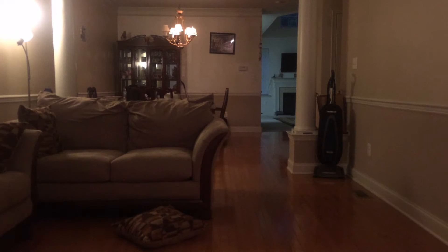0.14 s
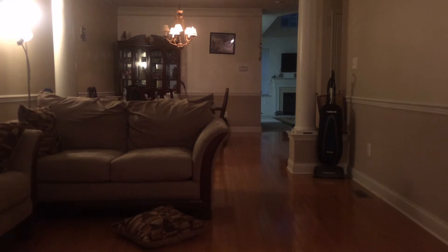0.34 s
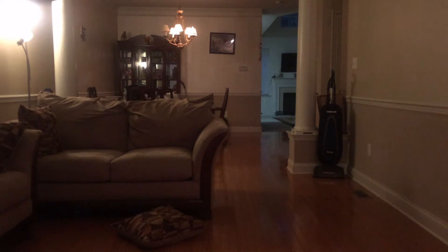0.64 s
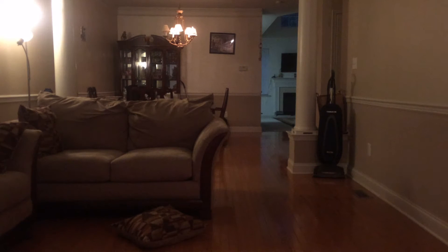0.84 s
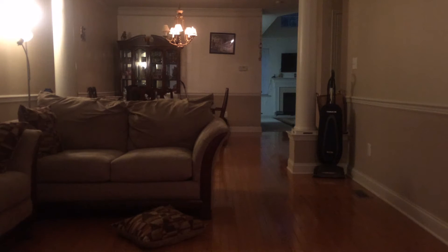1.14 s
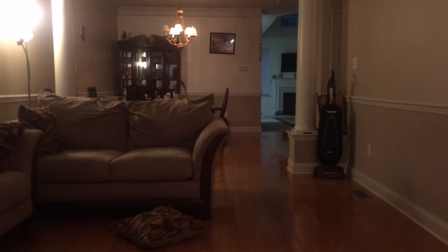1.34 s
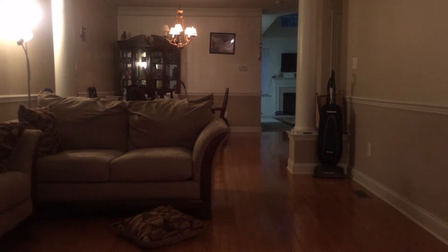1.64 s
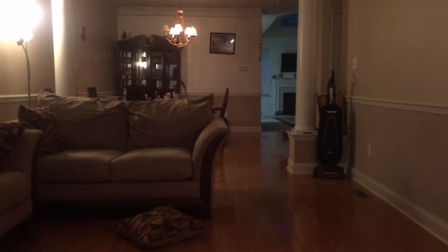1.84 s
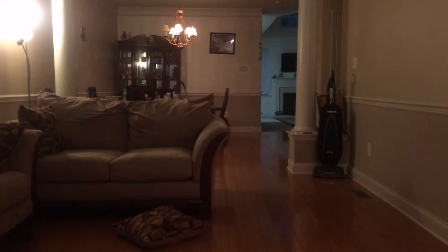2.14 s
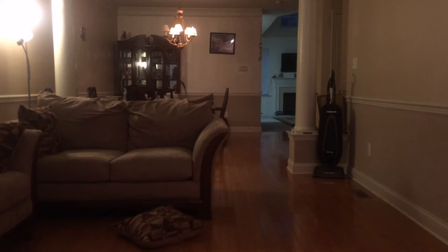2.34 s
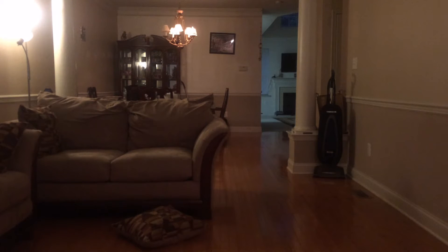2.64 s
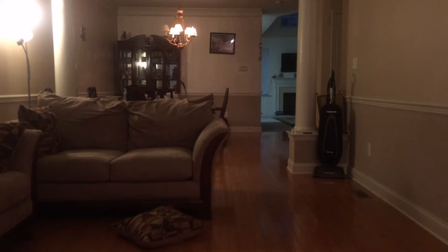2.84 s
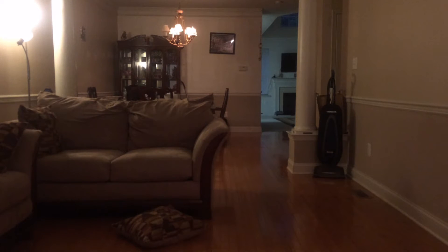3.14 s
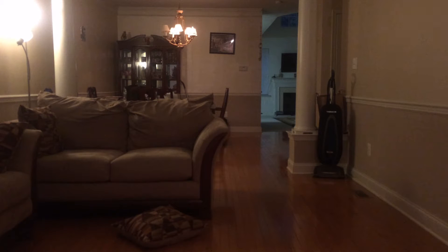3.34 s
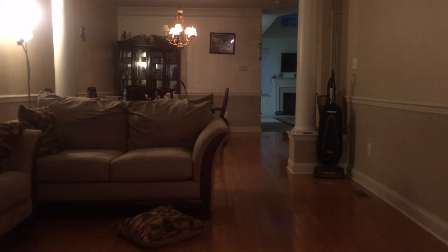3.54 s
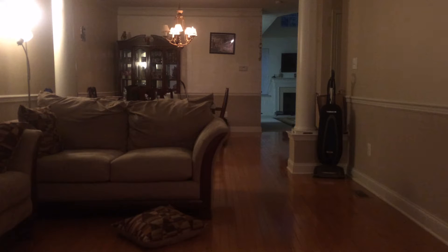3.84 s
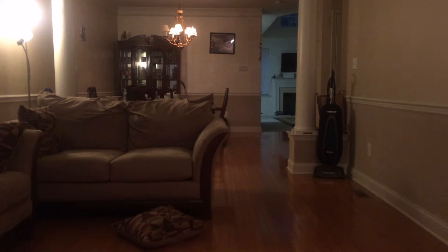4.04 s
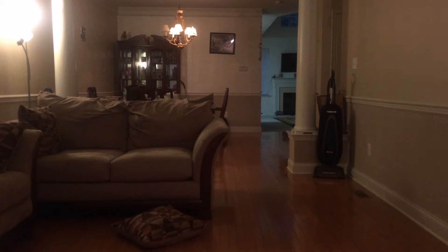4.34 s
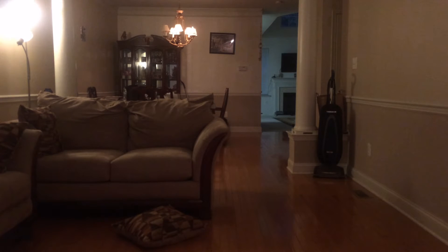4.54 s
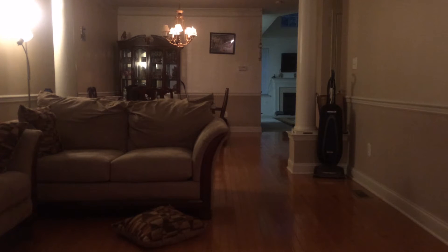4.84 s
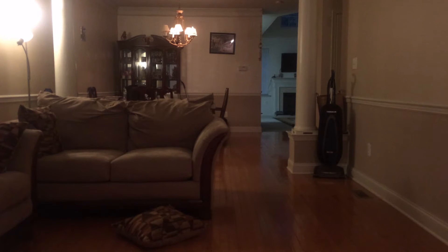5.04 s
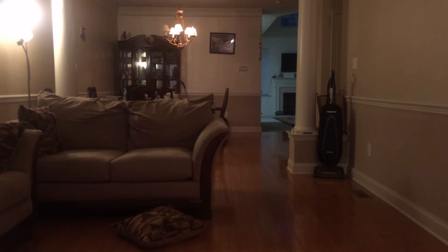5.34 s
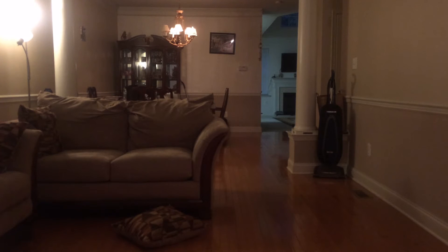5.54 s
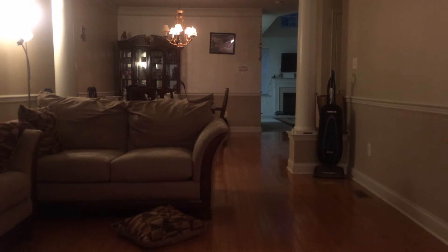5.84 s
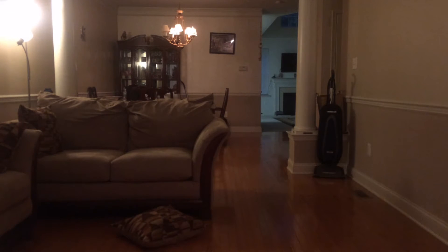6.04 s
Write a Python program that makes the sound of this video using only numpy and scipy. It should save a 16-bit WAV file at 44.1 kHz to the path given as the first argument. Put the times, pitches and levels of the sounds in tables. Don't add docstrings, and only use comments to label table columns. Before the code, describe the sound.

In a quiet living room with a wooden floor, a hollow plastic spring dart blaster is worked very near a phone microphone. It fires immediately at 0 s: a catch click and, milliseconds later, a plunger smack with a low airy thump. At 0.93-1.01 s the slide rattles back over its catches in a burst of cracks, then slams forward at 1.27 s, with a sharp tap at 1.34. Shot two snaps at 1.67. Pull at 2.11-2.18, slam at 2.46, shot at 2.81. Pull at 3.47-3.56, hard slam at 3.85, a small tap at 3.91, shot at 4.21. Pull at 4.74-4.81, slam at 5.16, final shot at 5.61. Faint handling ticks come between, and a last pull begins at 6.14, clacking at 6.17. Each knock rings briefly in the shell and splashes into a bright half-second room tail, over soft low rumble and faint hiss.

```python
import sys
import numpy as np
from scipy import signal
from scipy.fft import rfft, irfft
from scipy.io import wavfile
from scipy.ndimage import uniform_filter1d

SR = 44100
rng = np.random.default_rng(int(sys.argv[2]) if len(sys.argv) > 2 else 0)


def ratio(d):
    e = np.asarray(d, float) / 20
    return 10 ** e


def output_pcm(signal):
    pcm = np.clip(np.atleast_2d(signal).T, -1, 1) * 32767
    wavfile.write(sys.argv[1], SR, np.round(pcm).astype(np.int16))


N = 272979

# pitch_hz, density_db_per_hz
HUSH_SPECTRUM = [(18, -43), (30, -13), (157, 0), (215, -8), (740, -17.5), (1720, -16.5), (2750, -25.5),
                 (13000, -44.5), (14800, -46), (16000, -41)]
# delay_ms, level_db
ECHOES = [(3.1, -7.5), (9.8, -6), (13.5, -8.5), (18.6, -9.5), (27, -15), (41, -16)]
# pitch_hz, t60_s
ROOM_DECAY = [(60, 0.15), (160, 0.3), (420, 0.56), (1100, 0.63), (2900, 0.59), (7700, 0.55), (14000, 0.29)]
# pitch_hz, level_db
ROOM_COLOUR = [(60, 3.5), (250, -6), (1000, -2), (4000, 2), (9000, 1), (15000, 3)]
# pitch_hz, level_db, t60_s
STANDING_MODES = [(97, 4.5, 0.24), (164, -2, 0.23), (236.5, -4, 0.4), (315.7, -3.5, 0.59), (552.8, 1, 0.41),
                  (650, -9.5, 0.4), (702, -6.5, 0.34), (896, -1.5, 0.33), (1157, -2, 0.58),
                  (1260, -14.5, 0.24), (1605, 2.5, 0.25), (1970, -7.5, 0.58)]
# pitch_hz, level_db, t60_s
SHELL_MODES = [(605, -40, 0.019), (695, -1.5, 0.022), (937, 3, 0.012), (1234, 2, 0.014),
               (1350, 3.5, 0.0041), (1590, 6, 0.013), (2020, 2, 0.011), (2250, -1, 0.0037),
               (2930, 10.5, 0.0023)]
# pitch_hz, level_db, t60_s
TUBE_MODES = [(102, -9, 0.081), (163, 31, 0.07), (253, -17, 0.032), (293, 0, 0.041), (544, -15, 0.024)]
# pitch_hz, level_db
CRACK_SPECTRUM = [(300, -36), (1200, 4), (2500, 0.5), (3600, -2), (5000, 0), (7000, -2.5), (10000, -5.5),
                  (13000, -8), (16000, -18)]
# start_s, end_s
STROKES = [(.838, .928), (.932, 1.022), (1.222, 1.27), (2.1, 2.195), (2.386, 2.46), (3.467, 3.58),
           (3.782, 3.843), (4.723, 4.83), (5.073, 5.155), (6.137, 6.19)]
STROKE_LEVELS = [-63.5, -33.5, -36.5, -30.5, -33.5, -28, -31, -30.5, -27.5, -29.5]
# start_s, crack_peak_db, shell_minus_crack_db
TICKS = [(0, -36, 21), (0.8438, -47, 9), (0.908, -45, 11.5), (1.017, -24, -12), (1.648, -26, 0.5),
         (2.087, -40, 12), (2.1024, -32, 10), (2.1874, -30, -2), (2.765, -23, -7), (2.7722, -22.5, 1),
         (3.125, -41, 13.5), (3.181, -38, 12), (3.4635, -26.5, -10), (4.163, -29, -13), (4.17, -28.5, 4.5),
         (4.197, -28.5, 5), (4.7203, -29, -4), (5.58, -27.5, -13), (5.588, -37, 8), (5.998, -38, 6),
         (.9303, -33, 12), (2.378, -32, 14), (3.777, -40, 19), (3.838, -27, 17), (5.066, -32, 13),
         (6.1343, -31, 9), (3.914, -18, -3), (1.337, -6.5, -7.5)]
# start_s, crack_peak_db, shell_minus_crack_db, panel_hz
PULLS = [(.934, -19, 1, 1520), (.9408, -13, -5, 1440), (0.9531, -10, 0.5, 1590), (0.9597, -4, -3, 1560),
         (.9684, -2, -5.5, 905), (0.9851, 0, -6, 1590), (1.0004, -2, -9, 1640), (1.008, -5.5, 0.5, 613),
         (2.1106, -20, 5, 1420), (2.1186, -12, -6.5, 614), (2.1301, -4, -5, 1490), (2.1467, -1.5, -6, 1170),
         (2.1592, 0.5, -8.5, 2770), (2.1754, -2, -2, 875), (3.4723, -15.5, -1, 2060), (3.488, -5, -6, 1640),
         (3.5046, -7, -3, 1180), (3.5289, -0.5, -9, 2550), (3.5474, -2.5, -3, 1670), (3.56, -7, -5, 1870),
         (4.7349, -21, 4, 1520), (4.747, -14, -4, 1560), (4.7562, 0.5, -6.5, 1580), (4.7862, -4, -10, 1230),
         (4.8044, -3, -1.5, 2230), (4.813, -10, 2, 1545), (6.14, -32, 6, 675), (6.148, -18, 4, 1280),
         (6.1678, -.5, -14, 1580), (6.18, -16, 8.5, 1600)]
# start_s, crack_peak_db, shell_minus_crack_db, panel_hz
PUSHES = [(1.2164, -15, -19, 1240), (1.2206, -11, -3.5, 670), (1.2494, -18, 0, 1500),
          (1.2704, -1.5, -6.5, 1553), (1.279, 3.5, -3.5, 1358), (2.3835, -9.5, -4.5, 1450),
          (2.4384, -10, 2, 685), (2.4463, -19.5, 13.5, 800), (2.4613, -1.5, -2.5, 1810),
          (2.4704, -7, -12, 1840), (3.7808, -9.5, -7, 2100), (3.7934, -18, 0, 590),
          (3.8442, -2.5, -23, 1350), (3.8521, 4, -5, 2300), (3.8634, -1.5, -4, 2440),
          (5.0719, -12, 0, 1020), (5.1364, -19, 2, 1170), (5.1457, -11, 6, 1110),
          (5.1572, -1.5, -8.5, 1100), (5.163, -8, 1, 1183), (5.169, -6.5, 2, 1580), (5.177, -25, -2, 1610)]
# start_s, crack_peak_db, shell_minus_crack_db
CATCHES = [(.0055, -6, 3.5), (1.6716, -0.5, -9), (2.812, -2.5, -6), (4.2145, -4, -2.5), (5.6058, -4.5, -4)]
# rattle_ms, snap_minus_crack_db
KNOCK_KINDS = [
    (3.05, -1.5),
    (3.04, 1),
    (2.6, -3.5),
    (4.3, -10),
]
SLAM_TIMES = [.0133, 1.6772, 2.82, 4.222, 5.6132]
# blow_db, shell_shudder_db, air_thump_db, crack_db
SLAM_LEVELS = [(-11.5, -6, -32, -11.5), (-17, -3, -20.5, -12.5), (-6, -7, -17, -12.5), (-15, -5, -29, -13),
               (-7, -5, -22, -13)]
# delay_ms, level_db
REBOUNDS = [
    (0, 4),
    (2.8, -2),
    (9.3, -7.5),
    (14, -17),
    (24, -44),
]
# first_hz, first_db, second_hz, second_db
GRIPS = [(620, -9.5, 1000, -6.5), (775, -12.5, 1350, -13.5), (600, -10, 1770, -24), (1560, -14, 380, -6.5),
         (800, -16, 300, -9)]


def unit(x):
    return x / np.sqrt(np.sum(x ** 2))


def along(table, hz):
    point_hz, value = np.transpose(table)
    return np.interp(np.log(np.maximum(hz, 1)), np.log(point_hz), value)


def colour(x, table, size=512):
    cepstrum = irfft(np.log(ratio(along(table, np.fft.rfftfreq(size, 1 / SR)))))
    cepstrum[1:size // 2] *= 2
    cepstrum[size // 2 + 1:] = 0
    response = irfft(np.exp(rfft(cepstrum)))
    return signal.oaconvolve(x, unit(response))[:len(x)]


def thin(x, hz):
    return signal.sosfilt(signal.butter(3, hz, "high", fs=SR, output="sos"), x)


def ring(x, modes):
    t = np.arange(SR // 2) / SR
    response = 0
    for hz, db, t60_s in modes:
        response = response + ratio(db) * np.sin(2 * np.pi * hz * t) * ratio(-60 * t / max(t60_s, 1e-3))
    return signal.oaconvolve(x, unit(response))[:len(x)]


def strike(start_s, gains, rattle_ms, spiky=.8, size=1024, count=6):
    t = np.arange(size) / SR
    fade = np.exp(-1000 * t / np.clip(rattle_ms, .3, 5)[:, None])
    fade = fade * (1 - np.exp(-t / 0.00045))
    contacts = rng.standard_normal((len(start_s), size))
    fade = fade * abs(contacts) ** spiky
    for _ in range(count):
        tones = rfft(np.sign(contacts) * fade)
        contacts = irfft(tones / abs(tones))
    contacts = contacts * np.sqrt(np.sum(fade ** 2, 1, keepdims=True))
    out = np.zeros(N + size)
    first = np.maximum(start_s * SR, 0).astype(int)
    np.add.at(out, first[:, None] + np.arange(size), gains[:, None] * contacts)
    return out[:N]


def hush():
    hz = np.fft.rfftfreq(N, 1 / SR)
    noise = irfft(rfft(rng.standard_normal(N)) * ratio(along(HUSH_SPECTRUM, hz)), N)
    return unit(noise) * np.sqrt(N) * ratio(-57.5)


def stored(power, t60_s, step_s):
    keep = ratio(-120 * step_s / np.maximum(t60_s, .004)) + np.zeros(len(power))
    return np.array([signal.lfilter([1 - k], [1, -k], row) for k, row in zip(keep, power)])


def room(x, size=384, count=96):
    room_db, build_s = 0.96, 0.0027
    far_db, far_t60_s = -13.5, 1.55
    standing_db = -15.0
    step_s = count / SR

    early = np.zeros(SR // 10)
    early[0] = 1
    for delay_ms, db in ECHOES:
        early[int(delay_ms * SR / 1000)] += ratio(db)

    grid = dict(fs=SR, nperseg=size, noverlap=size - count)
    hz, _, tones = signal.stft(x, **grid)
    power = uniform_filter1d(abs(tones) ** 2, size=3, axis=0)
    power = stored(power, 7 * build_s, step_s)
    near_gain = ratio(2 * (room_db + along(ROOM_COLOUR, hz)))
    near = near_gain[:, None] * stored(power, along(ROOM_DECAY, hz), step_s)
    dull = 1 / (1 + (hz / 6000) ** 2) / (1 + (400 / np.maximum(hz, 1)) ** 4)
    far = ratio(2 * far_db) * dull[:, None] * stored(power, far_t60_s, step_s)

    noise = signal.stft(rng.standard_normal(N), **grid)[2]
    noise = noise / np.sqrt(np.mean(abs(noise) ** 2))
    field = signal.istft(noise * np.sqrt(near + far), **grid)[1]
    field = np.r_[np.zeros(size // 2 + count), field][:N]
    return signal.oaconvolve(x, early)[:N] + ratio(standing_db) * ring(x, STANDING_MODES) + field


def strokes():
    t = np.arange(N) / SR
    load = np.zeros(N)
    for (start_s, end_s), db in zip(STROKES, STROKE_LEVELS):
        load += ratio(db) * np.interp(t, [start_s, end_s, end_s + .004], [.2, 1, 0], left=0)
    grain_db = 2.05 * rng.exponential(size=(2, N)) - 5.5
    grains = load * rng.standard_normal((2, N)) * ratio(grain_db)
    return thin(colour(grains[0], CRACK_SPECTRUM) + ratio(0.5) * ring(grains[1], SHELL_MODES), 330)


def clacks():
    knocks = [row[:3] for row in PULLS + PUSHES] + CATCHES + TICKS
    start_s, crack_db, shell_db = np.transpose(knocks)
    counts = [len(kind) for kind in (PULLS, PUSHES, CATCHES, TICKS)]
    rattle_ms, snap_db = np.repeat(KNOCK_KINDS, counts, axis=0).T
    crack = colour(strike(start_s, ratio(crack_db - 9.5), rattle_ms), CRACK_SPECTRUM)
    snap = strike(start_s, ratio(crack_db + snap_db - 7.5), rattle_ms / 3)
    snap = thin(colour(snap, CRACK_SPECTRUM), 4300)
    shell = ring(strike(start_s, ratio(crack_db + shell_db - 9), rattle_ms), SHELL_MODES)
    return thin(crack + snap + shell, 441)


def panels(t60_s=0.035, size=2048):
    start_s, crack_db, shell_db, hz = np.transpose(PULLS + PUSHES)
    t = np.arange(size) / SR
    gains = ratio(crack_db + shell_db - 12.5)
    rings = gains[:, None] * np.sin(2 * np.pi * hz[:, None] * t) * ratio(-60 * t / t60_s)
    rings = rings * (1 - np.exp(-t / 0.00062))
    out = np.zeros(N + size)
    np.add.at(out, (start_s * SR).astype(int)[:, None] + np.arange(size), rings)
    return out[:N]


def slams():
    recoil_db = -2
    blow_db, shudder_db, thump_db, crack_db = np.transpose(SLAM_LEVELS)[:, :, None]
    delay_ms, fall_db = np.transpose(REBOUNDS)
    slam_s = np.array(SLAM_TIMES)
    hit_s = (slam_s[:, None] + delay_ms / 1000).ravel()

    blows, shove = np.zeros((2, N))
    np.add.at(blows, (hit_s * SR).astype(int), ratio(blow_db + fall_db).ravel())
    shove[(slam_s * SR).astype(int)] = -ratio(thump_db.ravel())
    catch_s = np.transpose(CATCHES)[0]
    shove[(catch_s * SR).astype(int)] = -ratio(thump_db.ravel() + recoil_db)

    push = -signal.oaconvolve(blows, unit(np.hanning(22)))[:N]
    shudder = strike(hit_s - .001, ratio(shudder_db + fall_db - 7).ravel(), np.full(len(hit_s), 4.0))
    shudder = thin(shudder, 416)
    crack = strike(hit_s, ratio(crack_db + fall_db - 1.5).ravel(), np.full(len(hit_s), 2.5))

    body = ring(ratio(2.0) * push + shudder, SHELL_MODES)
    for start_s, grip in zip(SLAM_TIMES, GRIPS):
        span = slice(int(start_s * SR) - 100, int(start_s * SR) + SR // 10)
        drive = push[span] + shudder[span]
        for hz, db in (grip[:2], grip[2:]):
            body[span] += ratio(db) * ring(drive, [(hz, 0, .03)])
    thump = thin(thin(ratio(16) * ring(shove, TUBE_MODES), 92), 92)
    return thin(body, 94) + thump + colour(crack, CRACK_SPECTRUM)


def scene():
    blaster = clacks() + panels() + slams() + strokes()
    return (room(blaster) + hush())[None]


def roll_off(x):
    return signal.sosfilt(signal.butter(12, 16400, fs=SR, output="sos"), x)


def record(dry):
    ceiling, top_hz = .8, 15250
    rounded = ceiling * np.tanh(thin(dry, 55) / ceiling)
    top_cut = signal.ellip(8, .3, 45, top_hz, fs=SR, output="sos")
    return roll_off(signal.sosfilt(top_cut, rounded))


dry = scene()
out = record(dry)
output_pcm(out)
```